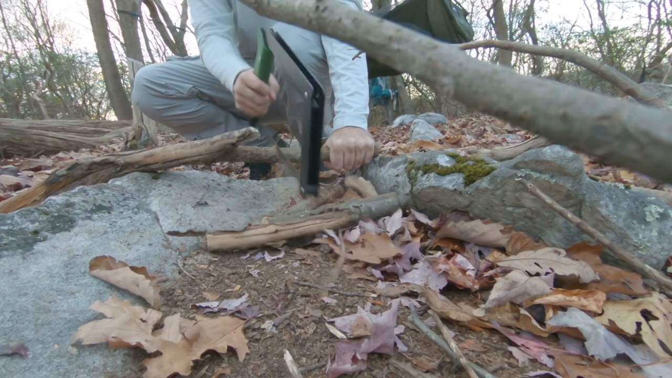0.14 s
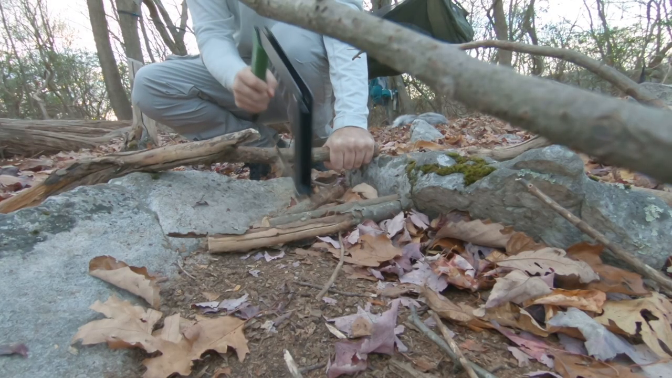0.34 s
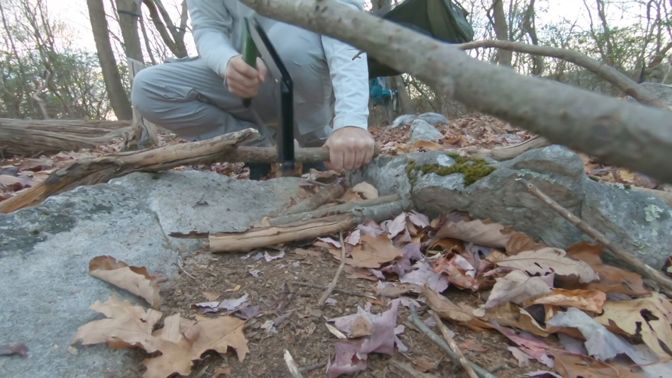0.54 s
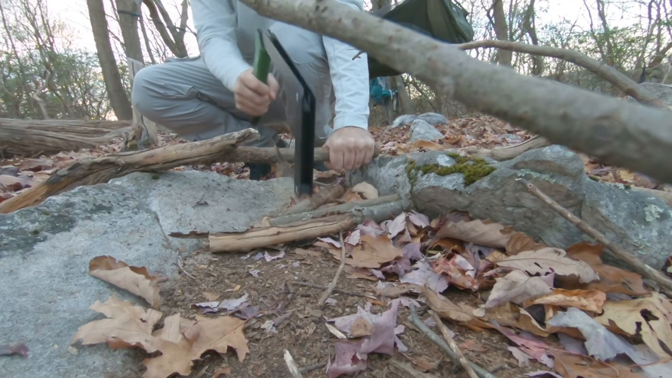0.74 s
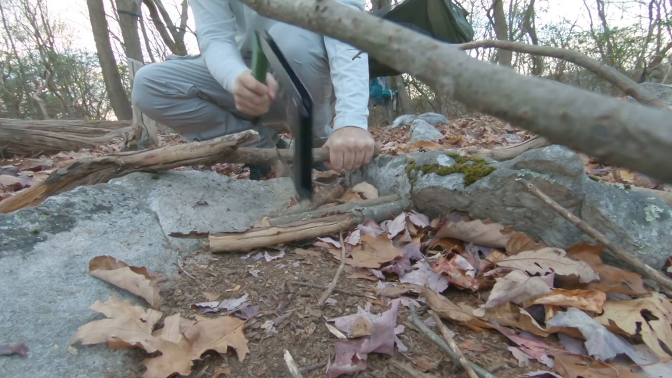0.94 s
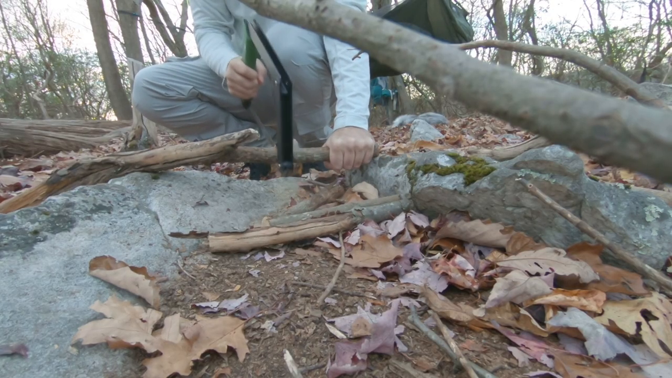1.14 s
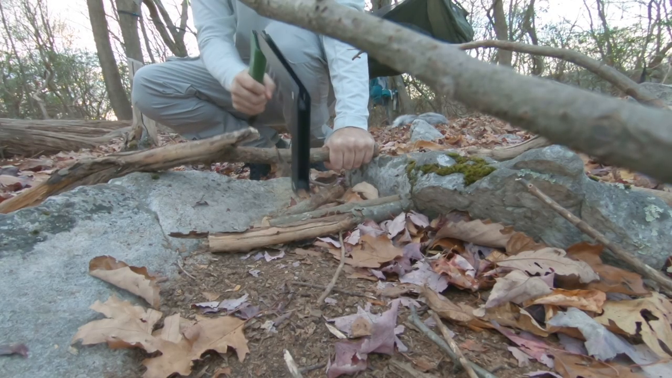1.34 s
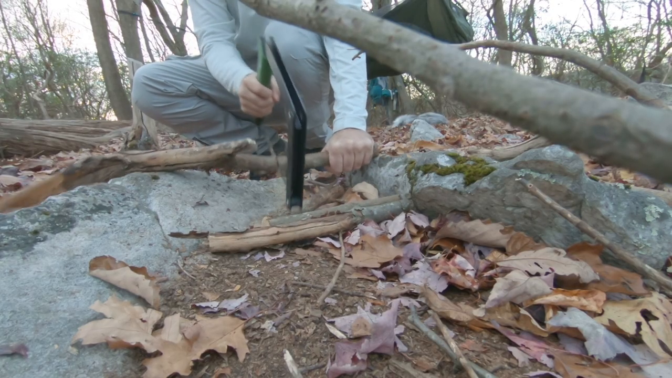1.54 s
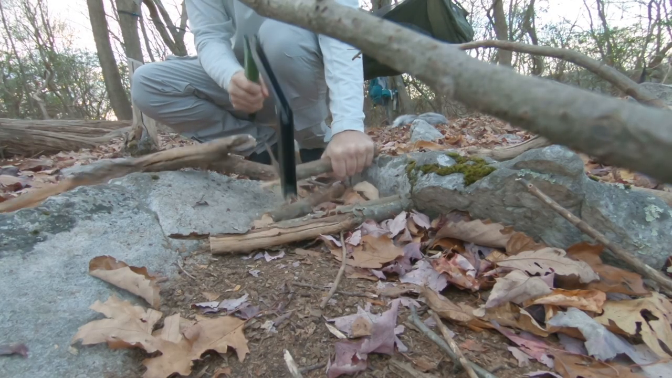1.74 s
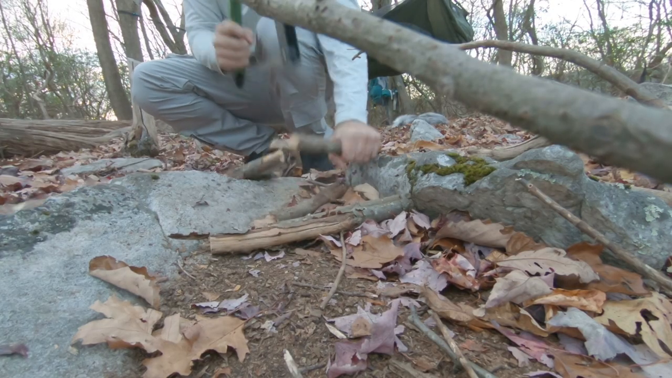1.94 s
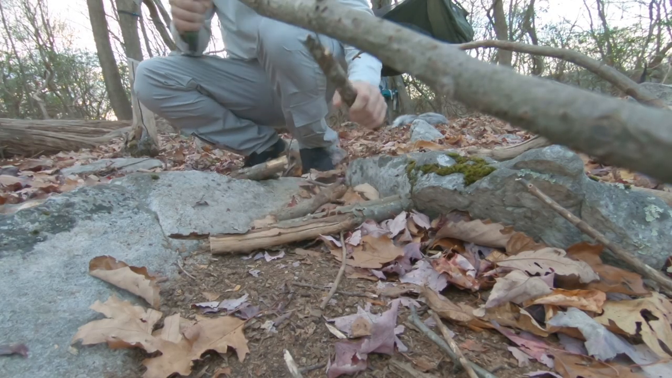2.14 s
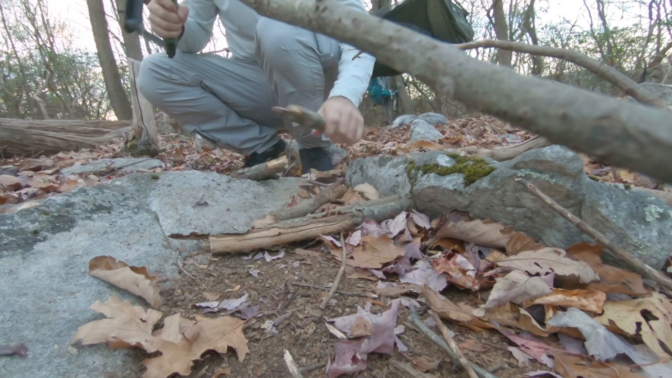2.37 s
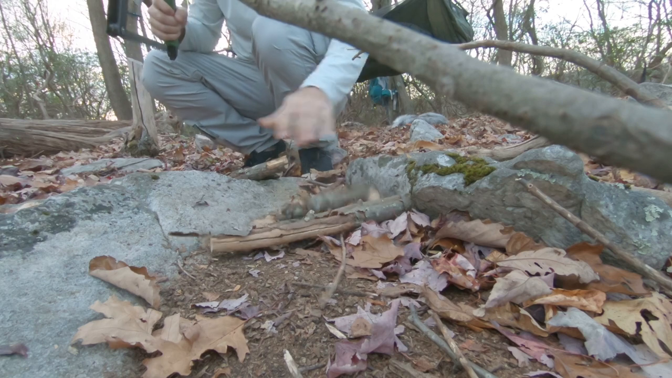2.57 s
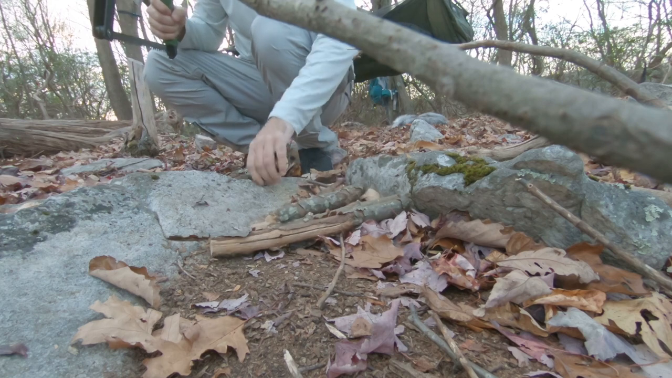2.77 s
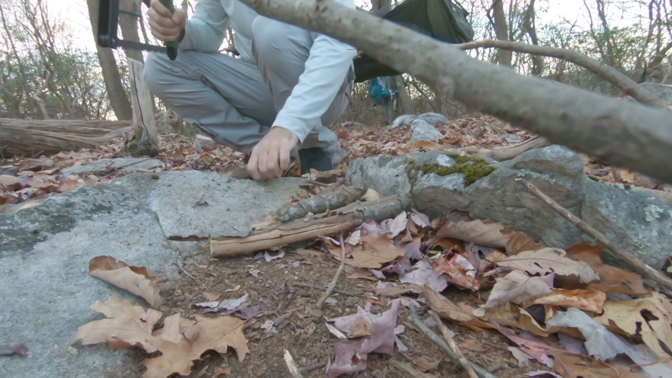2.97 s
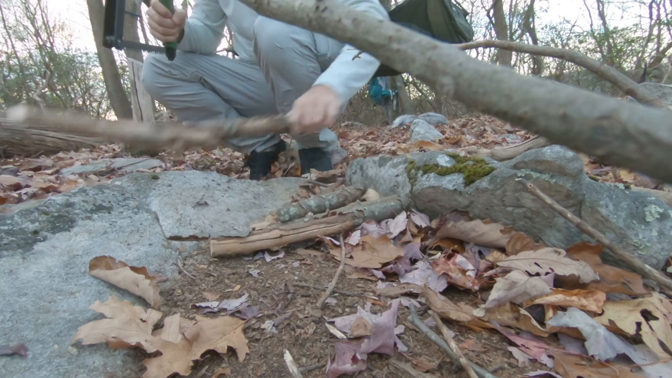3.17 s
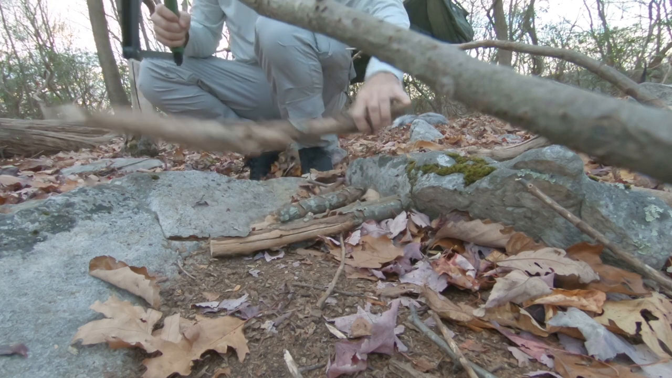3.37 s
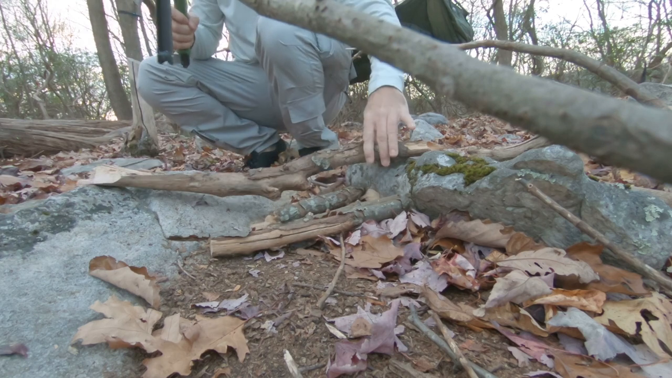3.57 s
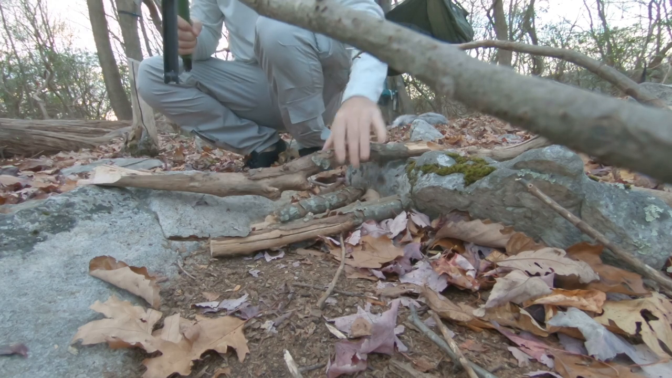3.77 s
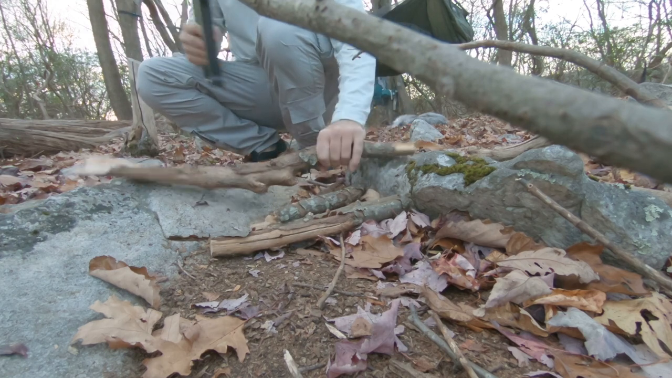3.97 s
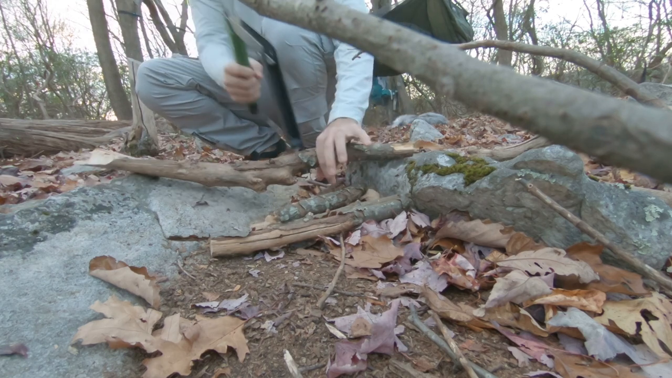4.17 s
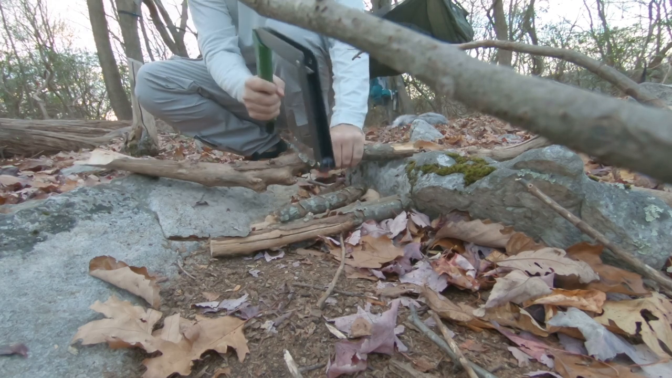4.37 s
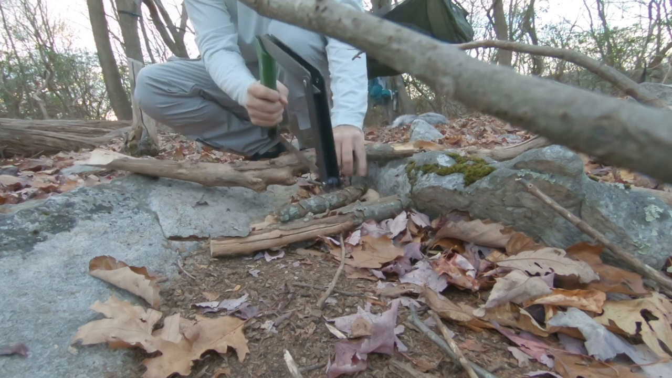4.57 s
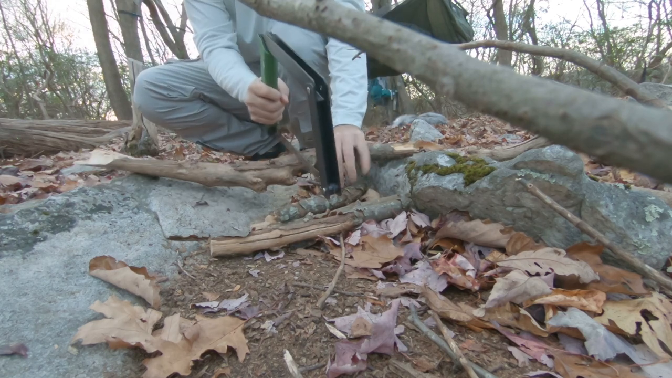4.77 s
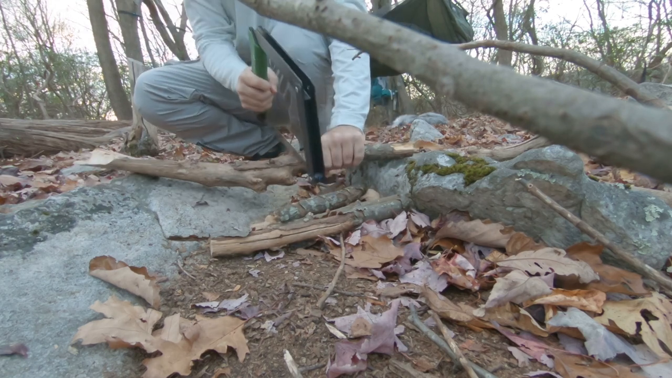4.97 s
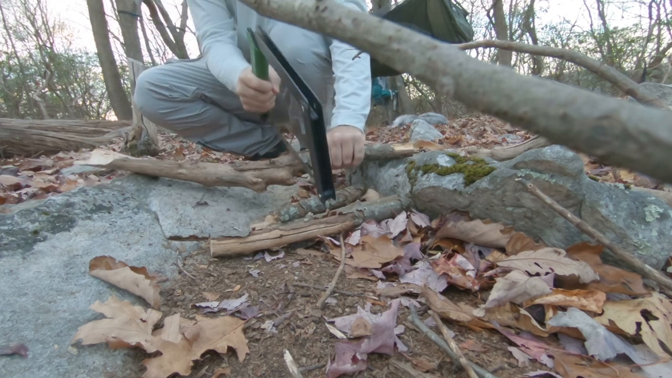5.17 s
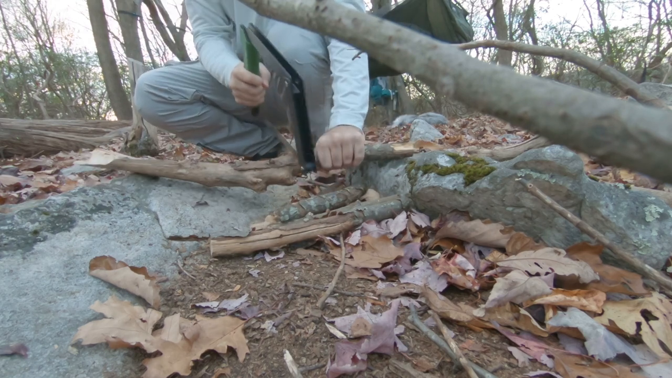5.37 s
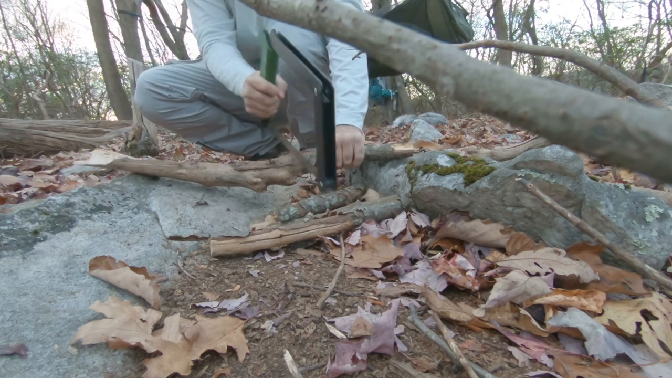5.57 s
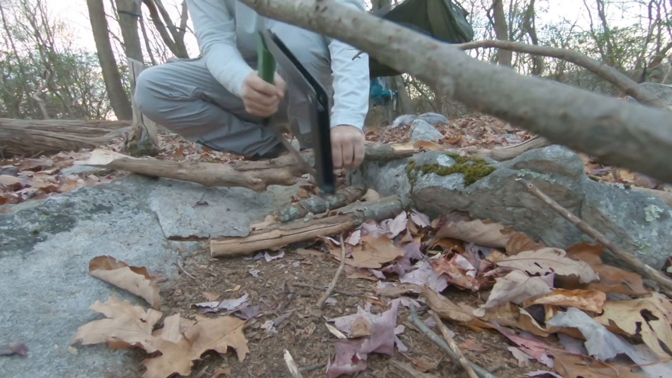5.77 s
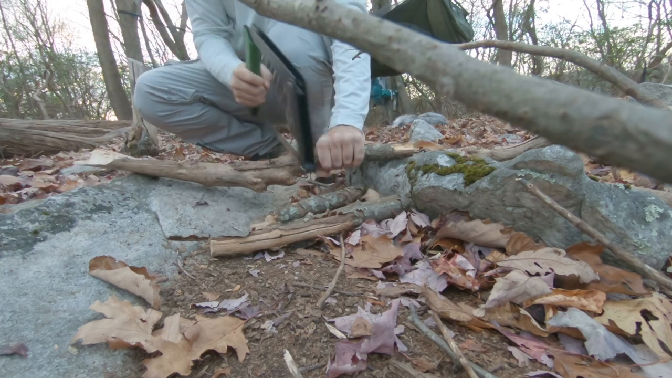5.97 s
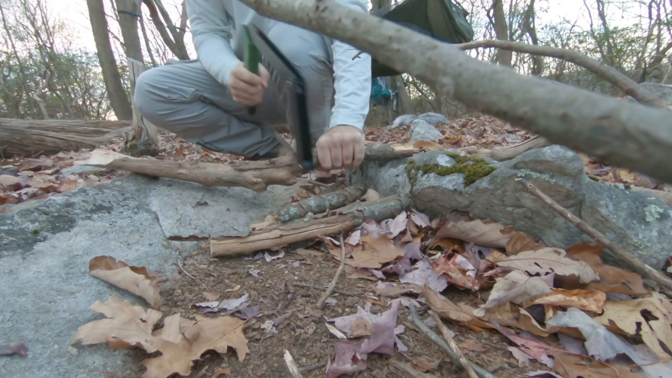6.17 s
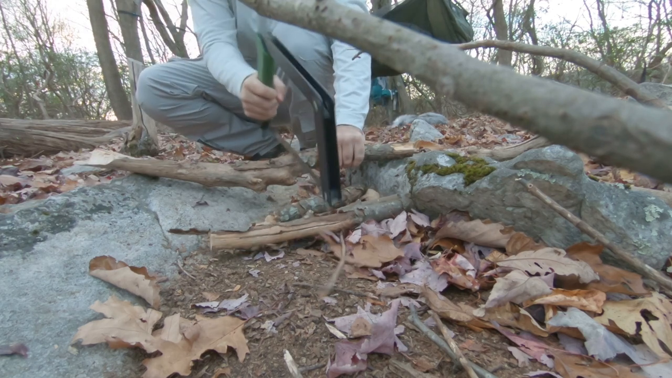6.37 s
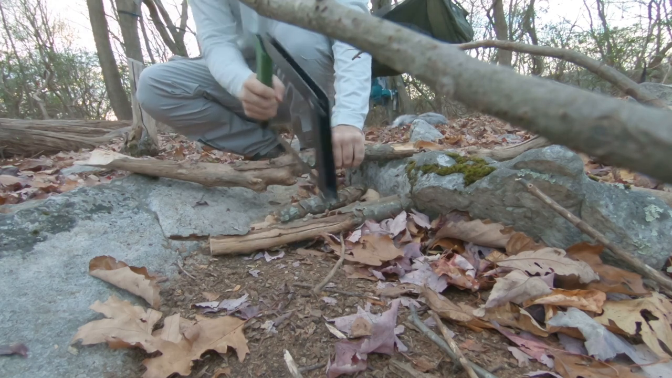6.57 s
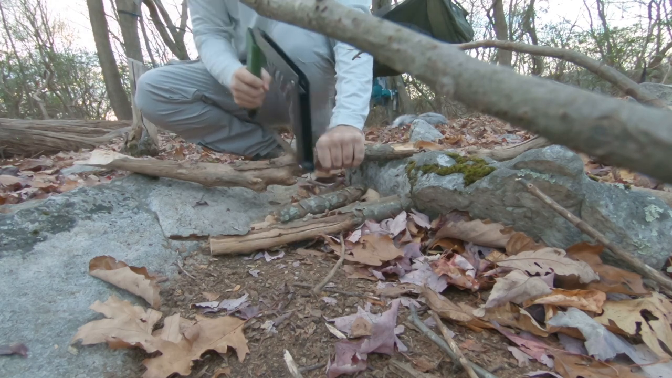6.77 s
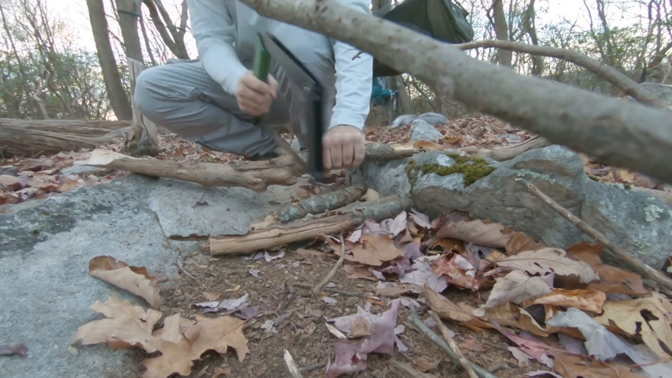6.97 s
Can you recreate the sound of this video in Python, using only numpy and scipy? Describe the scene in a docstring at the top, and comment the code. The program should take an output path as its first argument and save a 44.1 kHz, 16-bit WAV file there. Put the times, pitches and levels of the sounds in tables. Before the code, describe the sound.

A hand saw rasps rapidly through a dry branch outdoors, a piece drops with a ringing clack, leaves rustle, another branch knocks down, and sawing resumes.

```python
"""A folding bow saw rasps through a dead branch on a rock in quiet woods, seven strokes a second, its blade ringing.
Then the cut piece falls, clacking and ringing as it bounces; leaves rustle, made of thousands of tiny cracks.
A second branch is laid on the rock with hollow knocks while twigs snap, and a low murmur of noise swells and sinks.
At last the sawing starts again: noisy tearing of wood fibres sets the blade and the second branch ringing."""
import sys
import numpy as np
from scipy import signal
from scipy.fft import rfft, irfft
from scipy.io import wavfile
from scipy.ndimage import uniform_filter1d

SR = 44100
rng = np.random.default_rng(int(sys.argv[2]) if len(sys.argv) > 2 else 0)


def output_pcm(signal):
    """Save a mono or channel-first signal as 16-bit PCM at the path in sys.argv[1].

    Samples are clipped to [-1, 1] before scaling.
    """
    pcm = np.clip(np.atleast_2d(signal).T, -1, 1) * 32767
    wavfile.write(sys.argv[1], SR, np.round(pcm).astype(np.int16))


N = 309582
TIME = np.arange(N) / SR
SWAP_S = 3.0  # strokes from here on cut the second branch


def from_db(db):
    """Turn decibels into a plain multiplier."""
    return np.exp(np.asarray(db) * (np.log(10) / 20))


def rms_one(x):
    """Scale a sound to an average strength (rms) of 1."""
    return x / np.sqrt(np.mean(x ** 2) + 1e-20)


def between(start, end):
    """The samples from one time to another."""
    return slice(*np.searchsorted(TIME, [start, end]))


def follow(points):
    """Straight lines through the points (time [s], level [dB])."""
    return np.interp(TIME, *np.transpose(points))


def drift(rate):
    """Slow chance with a spread of 1, heading for a new value `rate` times a second."""
    knots = rng.standard_normal(N // 20)
    return np.interp(TIME * rate, np.arange(len(knots)), knots) * np.sqrt(3 / 2)


def coloured(x, points, size=4096):
    """Filter through the points (frequency [Hz], gain [dB]), with no sound ahead of its cause (minimum phase)."""
    hz, db = np.transpose(points)
    grid = np.maximum(np.fft.rfftfreq(size, 1 / SR), 1)
    log_gain = np.log(from_db(np.interp(np.log(grid), np.log(hz), db)))
    # folding the cepstrum forward in time makes the filter causal
    cepstrum = irfft(log_gain)
    cepstrum[1:size // 2] *= 2
    cepstrum[size // 2 + 1:] = 0
    return signal.oaconvolve(x, irfft(np.exp(rfft(cepstrum))))[:N]


def resonate(x, modes, wander_db=0):
    """Parallel resonances of alternating sign, each driven more or less strongly as the contact point moves."""
    out = np.zeros(N)
    for k, (hz, width, db) in enumerate(modes):
        r = np.exp(-np.pi * width / SR)
        level = db + wander_db * drift(16) if wander_db else db
        drive = x * from_db(level) + 1e-18
        push = np.array([1, 0, -1]) * (1 - r * r) / 2
        ringing = [1, -2 * r * np.cos(2 * np.pi * hz / SR), r * r]
        out += (-1) ** k * signal.lfilter(push, ringing, drive)
    return out


def contacts(rows, crack, extra_db=0):
    """Each contact is a sharp click and a dying crunch of the same overall energy, however long it lasts."""
    out = np.zeros(2 * N)
    t = TIME[:SR // 10]
    for (s, db, length, *_), more in zip(rows, np.zeros(len(rows)) + extra_db):
        force = rng.standard_normal(len(t)) * np.exp(-t / length)
        force[0] += crack
        at = round(s * SR)
        out[at:at + len(t)] += from_db(db + more) * force / np.linalg.norm(force)
    return out[:N]


def taps(rows, extra_db):
    """The net push of each contact, a single sample that sets the low modes ringing."""
    out = np.zeros(N)
    s, db = np.transpose(rows)[:2]
    out[np.round(s * SR).astype(int)] = from_db(db + np.asarray(extra_db))
    return out


def grains(per_s, spread_db):
    """Random tiny fractures of uneven size; rms 1."""
    sizes = from_db(spread_db * np.minimum(rng.exponential(1, N), 4)) * rng.choice([-1, 1], N)
    return rms_one(sizes * (rng.random(N) < per_s / SR))


def echoes(x, t60, delay):
    """A diffuse cloud of reflections with unit energy: it builds up over `delay` and fades 60 dB in `t60` [s]."""
    t = TIME[:SR]
    cloud = rng.standard_normal(SR) * from_db(-60 * t / t60) * (1 - np.exp(-t / delay))
    return signal.oaconvolve(x, cloud / np.linalg.norm(cloud))[:N]


# tone colour of the quiet woods: (frequency [Hz], gain [dB])
WOODS_COLOUR = [(18, -47.5), (30, -20), (92, -22), (154, 8.5), (274, -1.5), (567, -20), (754, -9.5),
                (1090, -33), (1410, -13.5), (3680, -16), (7060, -25.5), (10400, -51), (15000, -51.5)]


def woods_air(shared):
    """The steady hush of the woods: noise, partly common to both ears and partly each ear's own."""
    own = rng.standard_normal(N)
    return from_db(-65.5) * rms_one(coloured(shared + .5 * own, WOODS_COLOUR))


# how the low murmur swells and sinks, before a common boost: (time [s], level [dB])
MURMUR_SWELL = [(2.4, -81), (2.6, -68.5), (2.88, -73), (2.99, -67), (3.21, -71), (3.46, -69), (3.71, -63.5),
                (4.05, -56.5), (4.47, -68.5), (4.68, -62.5), (4.92, -54.5)]
# its tone colour: (frequency [Hz], gain [dB])
MURMUR_COLOUR = [(80, -28.5), (150, 2.5), (200, -0.5), (300, 0), (400, -12), (560, -42), (2000, -62)]


def low_murmur(boost_db=0.5):
    """Soft noise, mostly 150 to 300 Hz, with a slowly changing level."""
    murmur = rms_one(coloured(rng.standard_normal(N), MURMUR_COLOUR))
    return from_db(follow(MURMUR_SWELL) + boost_db) * murmur


def tree_echoes(near):
    """The trees send back a scattered echo, weakest in the middle of the range."""
    colour = [(100, -4), (400, -37.5), (2000, -27.0), (6000, -25), (14000, -17.5)]
    return coloured(echoes(near, t60=0.57, delay=0.024), colour)


# the branches are handled: (first time [s], last time [s])
HANDLING_S = (1.6, 6.1)
# a hand or a branch brushes through leaves and bark; rows with a negative fade stay silent:
# (loudest time [s], time to fade by 20 dB [s], crackle level [dB], scuff level [dB]), levels relative
BRUSHES = [(1.6, 0.45, -39, -58), (2.02, 0.23, -38, -57), (2.15, 0.03, -35.5, -50),
           (2.235, 0.03, -44.5, -50), (2.35, 0.24, -54.5, -77), (2.54, 0.37, -53.5, -73),
           (2.687, 0.0214, -23.5, -30.5), (2.79, 0.18, -40.5, -47), (2.99, 0.25, -52, -84),
           (3.075, 0.0856, -41.5, -50.5), (3.45, 0.14, -45.5, -68), (3.515, 0.15, -41, -56),
           (3.583, 0.1054, -70, -46.5), (3.715, 0.12, -47.5, -78), (3.94, 0.06, -49.5, -61),
           (4.019, .06, -47, -53), (4.098, 0.08, -54, -46.5), (4.24, 0.12, -50, -62.5),
           (4.42, 0.18, -52.5, -63), (4.62, 0.17, -48.5, -64), (4.694, -0.05, -44, -71),
           (4.92, -0.37, -45, -64), (4.98, 0.14, -38.5, -55), (5.15, 0.28, -47, -63)]


def brushing(stir_db=-71.5, rise_share=0.77):
    """Strength of crackle and of scuff over time: each brush builds up and fades, over a faint stir of crackle."""
    power = np.zeros((2, N))
    power[0, between(*HANDLING_S)] = from_db(stir_db) ** 2
    for s, fade_s, crackle_db, scuff_db in BRUSHES:
        now = between(s - 2 * fade_s, s + 2 * fade_s)
        after, before = TIME[now] - s, s - TIME[now]
        # a brush builds up in a share of the time it takes to fade
        away = np.maximum(after, before / rise_share) / fade_s
        power[:, now] += from_db(np.array([[crackle_db], [scuff_db]]) - 20 * away) ** 2
    return np.sqrt(power)


def ticks(per_s=6.5, middle_db=-23.5, spread_db=7.5, length_s=0.0025):
    """Small twigs give way at random moments: rows like those of the snaps."""
    first, last = HANDLING_S
    chance = rng.random((int(per_s * (last - first)), 2))
    return [(first + when * (last - first), middle_db + spread_db * (2 * size - 1), length_s)
            for when, size in chance]


# the loudest twigs and dry leaves snap: (time [s], relative level [dB], fade time constant [s])
SNAPS = [(1.543, 10.5, 0.0067), (2.65, 5, 0.011), (2.675, 12, 0.029), (3.342, -8.5, 0.00072),
         (3.528, 5, .009), (3.653, -9.5, 0.0013), (3.669, -13, 0.0025), (3.949, -6.5, 0.0017),
         (3.9916, 11, 0.0012), (3.9965, -1, 0.0023), (4.008, 0.5, .0015), (4.023, -2.5, 0.0021),
         (4.049, -8, .0015), (4.402, 3.5, 0.0028), (4.4205, 1, 0.002), (4.467, -10.5, 0.00054),
         (4.442, -7.5, 0.0013), (4.527, -8, 0.0016), (4.648, -7, 0.0022)]
# tone colours of snaps, crackling leaves and scuffed ground: (frequency [Hz], gain [dB])
SNAP_COLOUR = [(60, -36.5), (300, -26), (1200, -17.5), (2200, -14.5), (3200, 1.5), (4400, -6), (6000, -5),
               (7300, -10), (8500, -21), (11000, -26), (15000, -42.5)]
LEAVES_COLOUR = [(500, -30.5), (1500, -6), (3100, 1.5), (4500, -1.5), (7000, -4), (8500, -15.5),
                 (10500, -15.5), (15000, -39)]
SCUFF_COLOUR = [(60, -24.5), (170, 0), (600, 0), (1400, -3), (3000, -10.5), (10000, -50)]


def litter():
    """Dry leaves crackle and scuff under hand and wood, as clumps of tiny cracks; twigs snap."""
    crackle, scuff = brushing()
    clumps = rms_one(from_db(2.1 * drift(70)))
    leaf_cracks = grains(per_s=4000, spread_db=2.8)
    leaves = crackle * rms_one(coloured(leaf_cracks, LEAVES_COLOUR))
    ground_cracks = grains(per_s=3500, spread_db=4.0)
    ground = from_db(1.5) * scuff * rms_one(coloured(ground_cracks, SCUFF_COLOUR))
    snaps = coloured(contacts(SNAPS + ticks(), crack=2.6), SNAP_COLOUR)
    return clumps * (leaves + ground) + snaps


# a branch is set down on the rock, the loudest landing touching at two points:
# (time [s], relative level [dB], fade time constant [s], extra thud level [dB])
KNOCKS = [(2.649, 7.5, .0045, -7), (3.524, -2, 0.0084, -16.5), (3.539, 18, 0.00056, -4),
          (3.5402, 16.5, 0.0017, 4.5), (3.577, 5, 0.0033, 8.5), (3.949, -9, 0.0025, -12),
          (4.092, -1, .007, 11.5), (4.159, -27, .015, 33.5), (4.715, -18.5, 0.0035, -15)]
# tone colour of the knock: (frequency [Hz], gain [dB])
KNOCK_COLOUR = [(30, -43), (150, -11), (450, -3), (700, 1), (1400, 2.5), (2100, -12), (3500, -5.5),
                (5000, -17.5), (8000, -26), (15000, -37.5)]
# resonances of a branch on rock, and of its thud: (frequency [Hz], width [Hz], level [dB])
LOG_MODES = [(650, 45, 1), (760, 220, 1), (1017, 30, -6), (1230, 180, -1), (1717, 200, -4), (2044, 190, 1),
             (2600, 200, -7), (3160, 220, -6)]
THUD_MODES = [(91, 41, -6), (130, 12, 4), (167, 64, 2), (207, 33, 2.5)]


def branch(bark_db=-33):
    """A long branch lands with a hollow knock, a thud and a crack of bark."""
    force = from_db(4.0) * contacts(KNOCKS, crack=4.9)
    knock = coloured(force, KNOCK_COLOUR)
    hollow = resonate(force, LOG_MODES)
    thud = resonate(taps(KNOCKS, np.array(KNOCKS)[:, 3]), THUD_MODES)
    bark = coloured(contacts(KNOCKS, crack=1.8, extra_db=bark_db), SNAP_COLOUR)
    return knock + hollow + thud + bark


# the cut piece breaks off and bounces: (time [s], clack level [dB], ring level [dB]), levels relative
BOUNCES = [(2.049, 17.5, 33), (2.127, 7, 21), (2.162, 19, 29), (2.195, 1, 13), (2.215, 1, 16),
           (2.236, 0, 18), (2.277, -21, 15)]
# tone colour of the clack: (frequency [Hz], gain [dB])
CLACK_COLOUR = [(40, -20), (150, 1.5), (550, -12.5), (1100, -11.5), (1500, -7), (2800, -8), (4500, -18),
                (7000, -22.5), (10000, -48), (15000, -56)]
# resonances of the cut piece: (frequency [Hz], width [Hz], level [dB])
PIECE_MODES = [(119, 9.8, -13), (260, 34.5, -6.5), (304.2, 9, 3), (325, 19, -16), (557, 57, -11.5),
               (662, 26, -11), (892, 22, -11), (1500, 82, -15.5), (1750, 53, -23)]


def cut_piece(contact_s=0.026, shortening=0.68, grip_s=2.25, grip_db_per_s=230):
    """The short dry piece clacks and rings in its bending modes until the hand damps it."""
    # contact_s belongs to a bounce of 0 dB; harder bounces are shorter (dB per dB)
    hits = [(s, db, contact_s * from_db(-shortening * db)) for s, db, _ in BOUNCES]
    clack = coloured(contacts(hits, crack=1.7), CLACK_COLOUR)
    ring = resonate(taps([(s, ring_db) for s, _, ring_db in BOUNCES], 0), PIECE_MODES)
    damping = from_db(-grip_db_per_s * np.maximum(TIME - grip_s, 0))
    return clack + ring * damping


# saw strokes, pull and push in turn: (start time [s], length [s], relative level [dB])
STROKES = [(-0.035, 0.1, -30), (0.052, 0.19, -24.5), (0.212, 0.15, -27), (0.347, 0.19, -24.5),
           (0.52, 0.15, -28.5), (0.661, 0.15, -24.5), (0.801, 0.18, -28.8), (0.956, 0.15, -23.5),
           (1.069, 0.21, -29.5), (1.251, 0.14, -24.5), (1.39, 0.18, -36), (1.53, 0.14, -38),
           (1.632, 0.16, -37.5), (1.777, 0.13, -32.5), (1.866, 0.14, -41.5), (1.989, 0.097, -39.5),
           (4.931, 0.25, -30.0), (5.179, 0.13, -35), (5.345, 0.17, -27.5), (5.501, 0.15, -24.5),
           (5.649, 0.15, -27), (5.792, 0.13, -24.5), (5.922, 0.15, -25), (6.05, 0.14, -23),
           (6.181, 0.16, -25.5), (6.313, 0.16, -23.5), (6.459, 0.15, -25), (6.595, 0.148, -22.5),
           (6.73, 0.16, -27), (6.871, 0.14, -23)]
# what the two directions differ in:
# (share of the stroke before the blade is fastest, wood resonance [dB], brightness [dB], thump [dB])
PULL = (0.51, -4, 1.95, 2.2)
PUSH = (.483, 1.77, -1.6, .2)


def stroke_motion(bite_power, turn_s=0.0055):
    """Blade speed rises and falls in each stroke; the cutting force follows it, and the teeth still drag at the turn."""
    speed, power = np.zeros(N), np.zeros(N)
    for k, (start, length, db) in enumerate(STROKES):
        now = between(start, start + length)
        fastest = (PULL, PUSH)[k % 2][0]
        progress = (TIME[now] - start) / length
        swing = np.abs(np.sin(np.interp(progress, [0, fastest, 1], [0, np.pi / 2, np.pi])))
        speed[now] = np.maximum(speed[now], swing)
        power[now] += (from_db(db) * swing ** bite_power) ** 2
    smooth_power = uniform_filter1d(power, int(turn_s * SR))
    return speed, np.sqrt(np.abs(smooth_power))


def stroke_colour(second_pull_db=3, full_effort_db=-26, rocking_share=0.13):
    """Wood resonance, brightness and thump in dB over time, set by the direction and effort of each stroke."""
    start, length, db = np.transpose(STROKES)
    pulling = np.arange(len(STROKES)) % 2 == 0
    _, wood, bright, thump = np.where(pulling[:, None], PULL, PUSH).T
    # the second branch resonates more on the pull
    wood = wood + second_pull_db * (pulling & (start > SWAP_S))
    # a hard stroke presses the branch down, a light one lets it rock: thump per dB below full effort
    thump = thump + rocking_share * (full_effort_db - db)
    return [np.interp(TIME, start + length / 2, c) for c in (wood, bright, thump)]


# the teeth snag, or the saw knocks against the wood:
# (time [s], relative level [dB], fade time constant [s], extra wood resonance level [dB])
SNAGS = [(0.088, 12, .011, -1), (0.187, 18, 0.009, -19), (0.703, 16, .0035, -5), (0.81, 9.5, .0015, -3),
         (1.111, 5, .0027, 0.5), (1.353, 21.5, .0011, -40), (1.417, 3.5, 0.00088, -5), (1.433, 9, 0.013, 0),
         (1.478, 0, .0025, -2), (1.503, 11.5, 0.0025, -6.5), (1.538, 15, 0.0035, 1),
         (1.578, 1.5, 0.0072, 2.5), (1.612, 17.5, 0.0071, -7), (1.621, 23.5, .002, -23),
         (1.82, 11.5, .009, -5.5), (5.2, 10, 0.0054, -19), (5.249, 16.5, 0.0068, -2),
         (5.519, 6.5, 0.0046, -6), (5.541, 14.5, .011, 3), (6.784, 14.5, 0.0044, 0.5),
         (6.893, 13, .004, -12)]
# tone colours of the rasp, the wood and the thump: (frequency [Hz], gain [dB])
RASP_COLOUR = [(600, -11), (1100, -8), (1400, -6), (1750, -2.5), (2400, -0.5), (3200, -2), (4300, 1.5),
               (5200, -3.5), (6900, -9), (8100, -21.5), (10000, -17.5), (11200, -28), (13500, -37.5),
               (15800, -45.5)]
WOOD_COLOUR = [(30, -15), (60, -22), (130, -7.5), (300, 2.5), (550, -1), (800, 0), (1100, -4.5), (1400, -9),
               (2500, -22.5), (8000, -63)]
THUMP_COLOUR = [(20, -41), (50, -11), (100, -2.5), (160, 1), (300, -11), (1500, -57.5)]
# resonances of the taut blade, and its main tone: (frequency [Hz], width [Hz], level [dB])
BLADE_MODES = [(1967, 117, 2.5), (2110, 236, 2), (2250, 66, 7.5), (2605, 63, 5), (2732, 73, 6),
               (3030, 33, 5.5), (3529, 65, 6), (4070, 75, -1), (5460, 126, -3), (5585, 153, 1.5),
               (5950, 45, -16.5), (6450, 69, -13.5), (7460, 63, -4), (9400, 96, -14), (11930, 180, -24.5),
               (13600, 260, -32)]
MAIN_TONE = [(1947, 12, 9)]
# how freely the blade sings as the cut grips or frees it: (time [s], level [dB])
SINGING = [(0, 0.5), (1.1, 0.5), (1.62, -4.5), (5.55, 2), (6.13, 4), (6.4, 4), (6.7, 1.5), (7.0, 0)]
# resonances of the two branches under the saw: (frequency [Hz], width [Hz], level [dB])
FIRST_BRANCH = [(224, 190, 2.5), (278, 18, -30), (490, 160, -8.5), (671, 73, 0), (947, 37, 0)]
SECOND_BRANCH = [(348, 96, -4.5), (470, 22, -25), (485, 89, 4.5), (760, 110, -10.5), (827, 190, -39),
                 (1070, 65, 0.5)]


def saw(speed, force, teeth_per_s=430, tooth_depth=0.41, judder_db=1.86, saw_db=-0.57):
    """Teeth tear fibres; the tearing rasps, rings the blade and shakes the branch."""
    wood_db, bright_db, thump_db = stroke_colour()
    # each tooth bites hard and lets go; teeth_per_s holds around full blade speed
    tooth = np.cumsum(teeth_per_s * speed * from_db(2.5 * drift(150))) / SR % 1
    # the blade lurches and judders through uneven wood
    lurch = from_db(.6 * drift(90))
    judder = from_db(judder_db * drift(400))
    bite = rms_one(np.exp(-2 * tooth_depth * tooth) * lurch * judder)

    # fibres snap in the wood, and the steel is plucked by jolts of its own
    fractures = np.array([grains(per_s=9000, spread_db=0.5), grains(per_s=9000, spread_db=3.0)])
    tearing = force * bite * fractures
    snags = contacts(SNAGS, crack=4.5)
    treble = signal.sosfilt(signal.butter(1, 4000, "high", fs=SR, output="sos"), tearing)
    fibres, jolts = tearing + (from_db(bright_db) - 1) * treble
    rasp = coloured(from_db(7) * fibres + from_db(-7.5) * snags, RASP_COLOUR)

    pluck = from_db(10.0) * jolts + from_db(-7.5) * snags
    blade = resonate(pluck, BLADE_MODES, wander_db=3)
    tone = from_db(11.5) * resonate(jolts * from_db(follow(SINGING)), MAIN_TONE)

    shake = from_db(6.5 + wood_db) * force * bite * grains(per_s=5400, spread_db=3)
    shake += from_db(-3) * contacts(SNAGS, crack=2.7, extra_db=np.array(SNAGS)[:, 3])
    first = resonate(shake * (TIME < SWAP_S), FIRST_BRANCH, wander_db=2.5)
    second = resonate(shake * (TIME >= SWAP_S), SECOND_BRANCH, wander_db=2.5)
    wood = coloured(shake, WOOD_COLOUR) + from_db(-0.5) * (first + second)

    rocking = from_db(7.5 + thump_db) * force * rng.standard_normal(N)
    thump = coloured(rocking, THUMP_COLOUR)
    return from_db(saw_db) * (rasp + blade + tone + wood + thump)


# balance of the direct sound: (frequency [Hz], left minus right [dB])
LEAN = [(60, -1), (380, -1.5), (700, -0.7), (1250, 6), (2400, 2), (4400, 0.5), (8000, -0.5), (15000, -3)]
# strength of the sideways scatter: (frequency [Hz], gain [dB])
SCATTER = [(60, -52), (110, -8.5), (300, -31.5), (800, -10.5), (1300, -7.5), (2400, -20.5), (5000, -14.5),
           (7000, -4.5), (9000, -2.5), (15000, -5)]


def scene():
    """Mix the near sounds, their echoes and the background for the left and the right ear."""
    speed, force = stroke_motion(bite_power=1.65)
    knocks = cut_piece() + branch()
    near = saw(speed, force) + knocks + litter()
    # saw and leaves are spread out and send other grains sideways; the rock scatters the knocks
    scattered_knocks = echoes(knocks, t60=0.016, delay=.001)
    side = coloured(saw(speed, force) + litter() + scattered_knocks, SCATTER)
    shared_air, murmur = rng.standard_normal(N), low_murmur()
    out = []
    for sign in (1, -1):  # left, right
        direct = coloured(near, [(hz, sign * db / 2) for hz, db in LEAN])
        out.append(direct + sign * side + tree_echoes(near) + woods_air(shared_air) + murmur)
    return np.array(out)


def record(dry, lowest_hz=42, cutoff_hz=15500):
    """The deepest lows are filtered out, peaks stop at full scale, the top is cut."""
    lean = signal.sosfilt(signal.butter(2, lowest_hz, "high", fs=SR, output="sos"), dry)
    top_cut = signal.ellip(10, .1, 90, cutoff_hz, fs=SR, output="sos")
    return signal.sosfilt(top_cut, np.clip(lean, -1, 1))


dry = scene()
out = record(dry)
output_pcm(out)
```